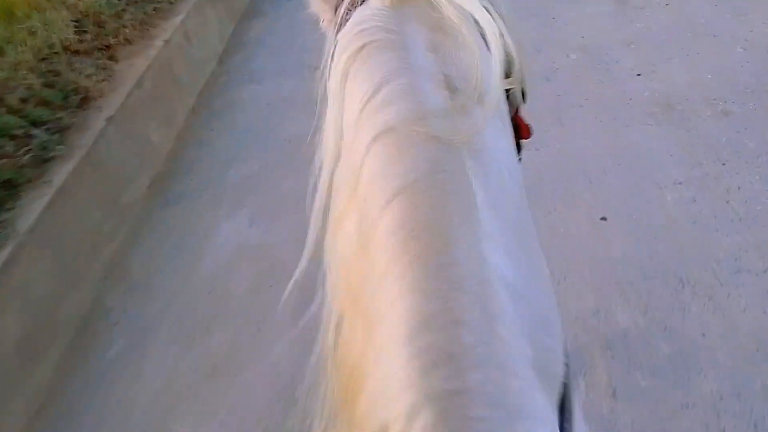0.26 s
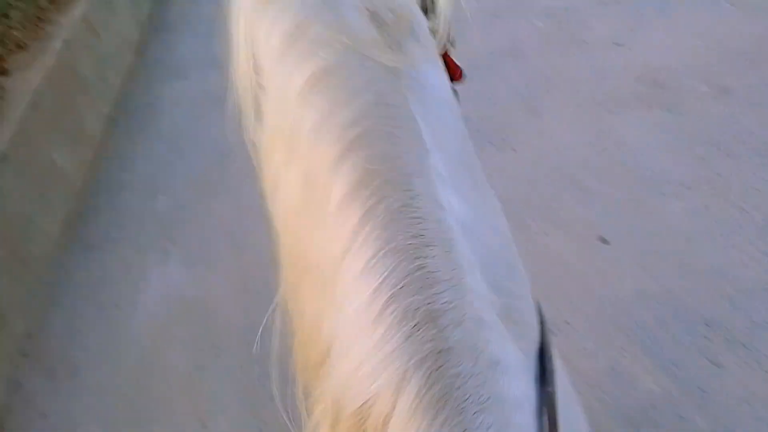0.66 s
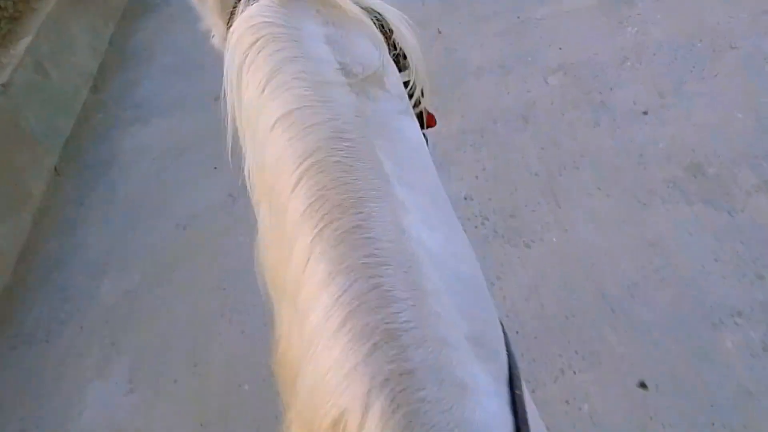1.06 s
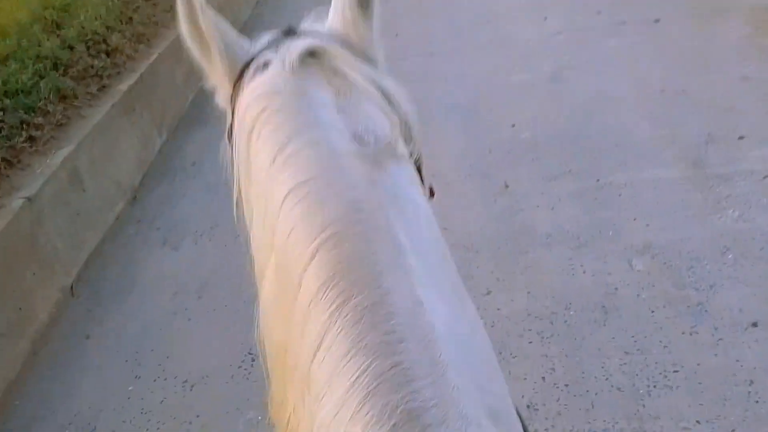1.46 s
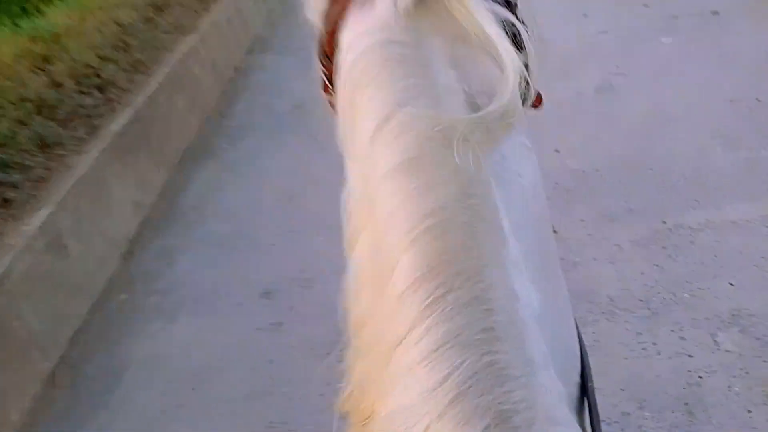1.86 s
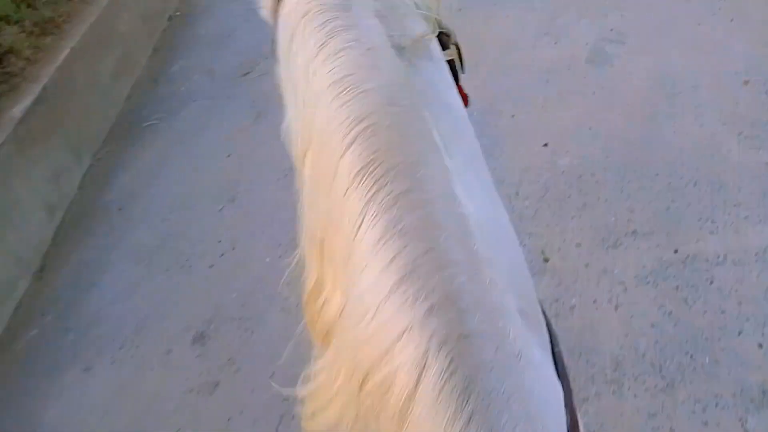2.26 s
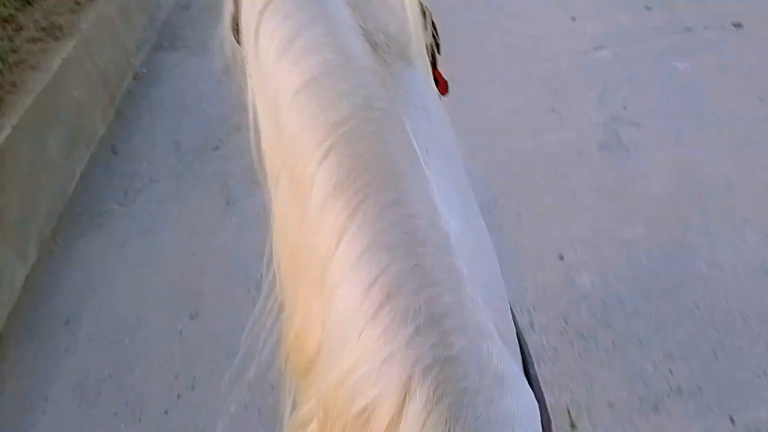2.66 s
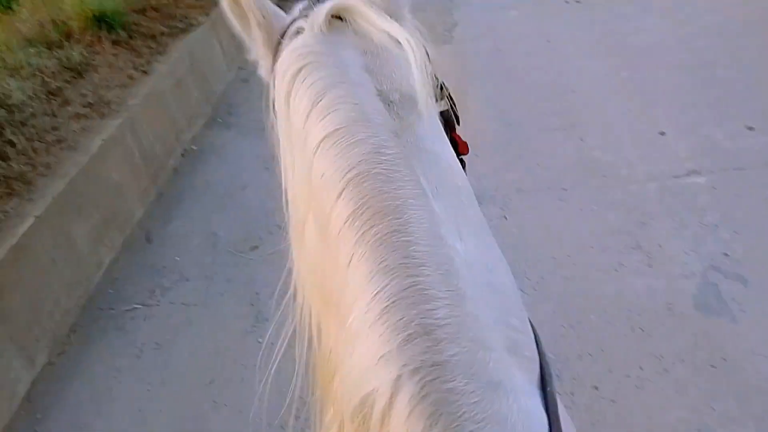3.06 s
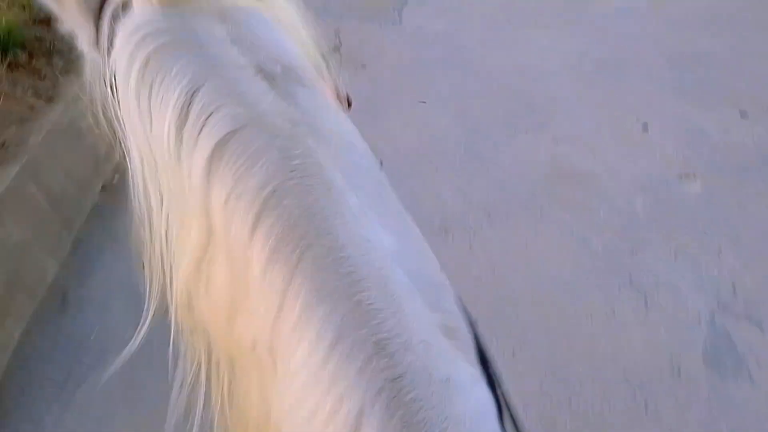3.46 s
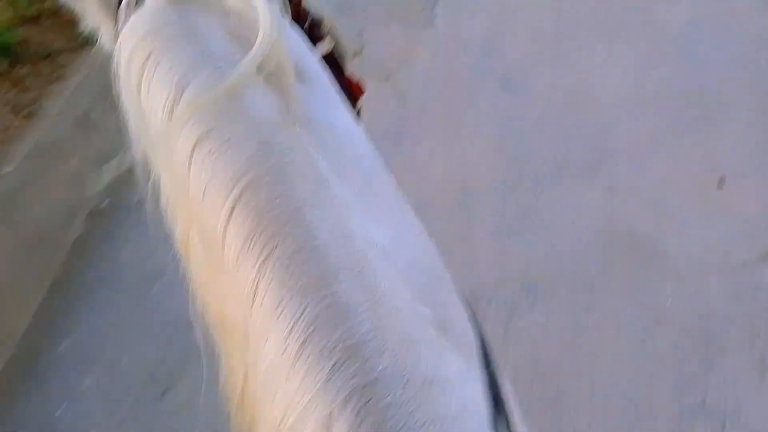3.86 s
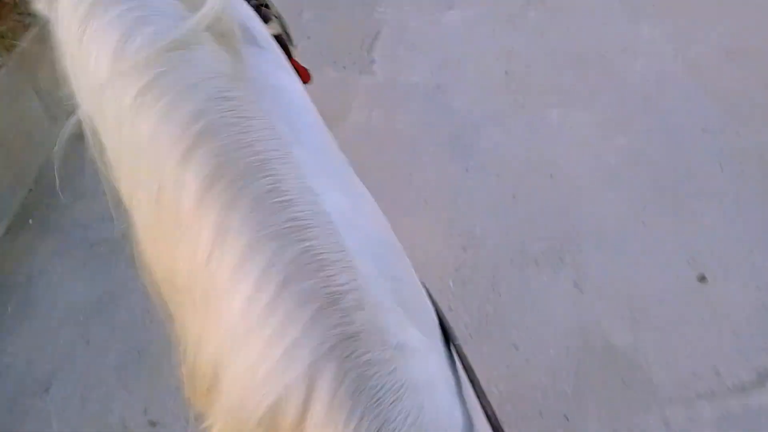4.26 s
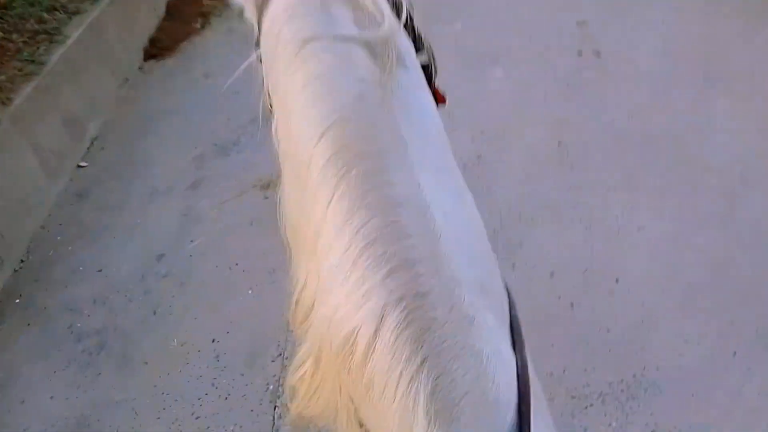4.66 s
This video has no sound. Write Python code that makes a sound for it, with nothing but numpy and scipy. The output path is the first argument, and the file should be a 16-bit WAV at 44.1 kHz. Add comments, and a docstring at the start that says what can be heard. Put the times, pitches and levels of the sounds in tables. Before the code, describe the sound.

Outdoors on a concrete road, heard close from the saddle, shod hooves strike with irregular, short hollow clops, sharp clacks and small gritty scrapes. Low jolts and wind rumble on the microphone. A distant one-cylinder engine putters, slowly sinking in speed, draws nearer after three seconds with a thin whine, then surges loudly just after four seconds. Faint fast cricket chirps fade gradually.

```python
"""Horse and engine on a concrete road

A horse walks, heard from the saddle: struck hooves ring as damped modes, the shoe rim clacks and grit snaps.
The stride thumps the microphone as low damped swings. A one-cylinder engine draws near and opens its throttle:
firing pulses excite pipe and muffler resonances, and shaped noise gives clatter and rasp; a thin tone whines.
Crickets chirp in falling tone pulses on the verge, over filtered noise for far street and wind."""
import sys
import numpy as np
from scipy import signal
from scipy.fft import rfft, irfft, next_fast_len
from scipy.io import wavfile

SR = 44100
rng = np.random.default_rng(int(sys.argv[2]) if len(sys.argv) > 2 else 0)


def generate_wav(sig):
    """Save sig (samples, or channels by samples) to the path in sys.argv[1] as 16-bit PCM at SR."""
    pcm = np.round(np.clip(np.atleast_2d(sig).T, -1, 1) * 32767).astype(np.int16)
    wavfile.write(sys.argv[1], SR, pcm)


N = 212601
TIME = np.arange(N) / SR

# All levels are relative; spectra are levels per hertz before scaling to rms 1.
# hoof contacts: start_s, level_db, ring_hz, hollow_knock_db (re contact), crack_db (re contact)
HOOF_CONTACTS = [(0.012, -14, 1030, -9, -8), (0.189, -14, 910, -4.5, -20), (0.215, -25.5, 785, -10, -2.5),
                 (0.393, -27, 1220, -1.5, 6), (0.399, -16, 974, -9, 0), (0.478, -16.5, 1185, -7, -7.5),
                 (0.529, -22.5, 890, -1.5, 0.5), (0.654, -28, 920, 3.5, -1), (0.668, -24.5, 970, -0.5, -9),
                 (0.684, -24, 966, -3, -5), (0.944, -13.5, 1082, -7, -5.5), (1.118, -22.5, 820, -4, -4),
                 (1.235, -20, 740, -8.5, -25), (1.281, -30, 930, 1, 3.5), (1.397, -23.5, 780, -7, -5),
                 (1.426, -13, 1186, -12, -14), (1.444, -16, 1010, -16, -11), (1.576, -30.5, 950, 6, 0.5),
                 (1.864, -8.5, 1110, -9.5, -7), (2.009, -26.5, 940, -0.5, -23),
                 (2.314, -10.5, 1107, -14, -8), (2.365, -14, 1020, -17.5, -7.5),
                 (2.456, -32.5, 920, 6, -17), (2.657, -29, 770, -9.5, 1), (2.699, -23, 716, -7.5, -2.5),
                 (2.779, -8, 1075, -13.5, -15), (3.035, -30, 800, 0.5, 4), (3.234, -14.5, 1020, -8.5, -19),
                 (3.275, -8.5, 930, -19, -18), (3.688, -8, 1022, -14, -12), (3.813, -23.5, 865, -14, -20),
                 (4.051, -29, 770, -6, 0), (4.108, -31, 1004, -4.5, 0), (4.146, -14.5, 1070, -10, -9.5),
                 (4.191, -9, 904, -19, -20), (4.276, -26.5, 860, 3.5, -6), (4.325, -23, 797, -5.5, -4),
                 (4.609, -16, 910, -12, -11)]
# modes of a hoof whose ring is HOOF_RING_HZ: frequency_hz, level_db, t60_s
HOOF_MODES = [(410, -10, 0.047), (518, -2, 0.024), (685, -8, 0.037), (1088, -1.5, 0.016),
              (1263, -23, 0.042), (1733, -11, 0.013), (1976, 3.5, 0.0071), (2596, -50, 0.03),
              (3200, -24.5, 0.0035), (5100, -55, 0.01)]
HOOF_RING_HZ = 1094
# the heel lands first and the toe follows, softer and lower
TOE_LAG_S, TOE_DB, TOE_PITCH_RATIO = 0.00496, -10.5, 0.9
# noise of the crack on concrete: frequency_hz, level_db
CRACK_SPECTRUM = [(350, -2.5), (700, 11.5), (1200, 8), (1650, -13.5), (2300, 2), (3100, -10.5),
                  (4500, -25.5), (8000, -30.5), (15000, -52)]
# hard strikes on the shoe rim: start_s, level_db, pitch_hz
RIM_CLACKS = [(.478, -31, 2050), (.944, -19.5, 2540), (1.447, -23, 1980), (1.866, -29, 1960),
              (2.3142, -6, 1284), (2.3149, -16, 1890), (2.779, -39, 1280)]
# grit crushed under a sliding hoof: start_s, level_db, length_s
SCUFFS = [(.005, -36.5, 0.031), (0.2, -38.5, 0.017), (.399, -25, 0.019), (0.513, -42, 0.0076),
          (0.664, -36, 0.035), (0.949, -29.5, 0.012), (1.806, -41, 0.029), (1.87, -37, 0.019),
          (2.029, -31, 0.021), (2.331, -33, 0.041), (2.485, -38.5, .04), (2.78, -32.5, 0.016),
          (3.23, -32.5, 0.019), (3.683, -30, 0.013), (4.331, -31, 0.02)]
# noise of crushed grit: frequency_hz, level_db
GRIT_SPECTRUM = [(500, 27), (1200, 9), (2800, 12), (4500, 0.5), (7000, -13.5), (11000, -13.5),
                 (15000, -27.5)]
# single pebbles snapping under the shoe: start_s, level_db
PEBBLE_SNAPS = [(0.3985, -24.5), (.4075, -39), (0.5317, -38.5), (1.817, -40), (2.041, -38), (3.583, -38),
                (3.69, -36), (4.34, -31), (4.354, -32.5)]
# noise of a snapping pebble: frequency_hz, level_db
SNAP_SPECTRUM = [(800, -8.5), (2500, 0.5), (4500, 21.5), (7500, -15), (11500, 14), (15500, -29.5)]
# jolts of the ride: start_s, level_db, pitch_hz
RIDE_THUMPS = [(0.215, -3.5, 104), (0.391, -6, 138), (1.084, -5, 91), (1.282, -3, 56.5), (1.567, -1.5, 73),
               (2.358, -5, 94), (2.502, -1, 59.4), (2.536, -3.5, 53.6), (2.658, -2, 102), (3.034, -2, 103),
               (3.118, -9.5, 73.6), (3.345, -7, 97.5)]

# engine speed, sinking but for one brief rise around the throttle opening: time_s, firings_per_s
FIRING_RATE = [(0, 36.39), (.34, 33.305), (1.06, 32.284), (1.26, 31.376), (2.52, 28.488), (2.98, 26.596),
               (3.98, 25.341), (4.15, 28.436), (4.37, 25.591)]
# weak firings on the overrun: time_s
MISFIRES = [3.385, 3.618, 3.815, 3.932, 4.048]
# lowest exhaust pipe resonance with the throttle shut: time_s, frequency_hz
PIPE_RESONANCE = [(0, 127.7), (.9, 138), (1.5, 131.2), (2.2, 116.2), (2.9, 127), (3.6, 128.7)]
# hotter gas raises the pipe's pitch once the throttle opens
THROTTLE_S, PIPE_RISE_HZ, PIPE_RISE_S = 4.06, 16.4, 0.078
# muffler resonances when the pipe is at MUFFLER_PIPE_HZ: frequency_hz, width_hz, level_db
MUFFLER_MODES = [(233.4, 60, 4.5), (307.3, 44.6, 6.5), (390, 65, -12), (464, 27, -5)]
MUFFLER_PIPE_HZ = 145
# noise of the clattering casing: frequency_hz, level_db
CLATTER_SPECTRUM = [(300, 10.5), (550, 6.5), (760, 11), (950, 10.5), (1250, -1), (1700, -8.5), (2050, 8),
                    (2800, 3.5), (3300, -4), (5000, -17.5), (6500, -19), (9000, -25.5), (11500, -22),
                    (16000, -50)]
# noise of the bright treble hiss: frequency_hz, level_db
RASP_SPECTRUM = [(1500, -24), (3000, -1), (4500, 4), (6500, -8.5), (11000, -14), (16000, -27)]
# the vehicle draws near: time_s, distance_m
VEHICLE_DISTANCE = [(0, 31), (.5, 28.7), (2.8, 28), (3.4, 13.8), (4.05, 13.2), (4.82, 7.4)]
REFERENCE_M = 30
# rows boom, bark, clatter: level_db (at REFERENCE_M), gain_db (per halving of distance),
# gain_db (throttle open), rise_s (time to reach that gain)
ENGINE_LEVELS = [(-22.5, 2.5, 10.5, 0.29), (-30, 7, 4.5, 0.12), (-52, 5.5, 5, .07)]
# whine of the coasting vehicle, sagging as it slows; WHINE_HZ is the starting pitch
WHINE_START_S, WHINE_END_S, WHINE_FADE_S = 3.27, 4.24, 0.08
WHINE_HZ, WHINE_SAG_HZ_PER_S, WHINE_DB, WHINE_WAVER_DB = 928, 22, -46, 1.5

# runs of chirps: first_s, last_s, chirp_count, level_db (re the nearest cricket)
CHIRP_RUNS = [(.008, .445, 8, 0), (.504, 2.298, 31, 0), (2.36, 2.78, 8, -3), (2.88, 4.63, 30, 0),
              (.70, 2.82, 35, -7)]
# the crickets fall behind as the horse walks on; each wing stroke fades as it goes
CRICKET_DB, RECEDE_DB_PER_S, STROKE_FADE_DB = -46, 2.15, -9.5
# far street noise: frequency_hz, level_db
STREET_SPECTRUM = [(100, -21), (180, -2), (300, 4), (450, -9), (700, -19.5), (1000, -18.5), (1600, -30),
                   (2500, -31), (4000, -35.5), (6000, -43.5), (9000, -49), (11300, -44), (15500, -62.5)]
# wind noise on the microphone: frequency_hz, level_db
WIND_SPECTRUM = [(5, 3.5), (18, 8.5), (35, 0), (60, -2.5), (90, -7.5), (130, -10), (200, -21), (400, -41.5),
                 (900, -81)]
# wind strength: time_s, level_db
GUSTS = [(0, -21), (1.1, -19.5), (1.3, -17.5), (1.9, -21), (2.5, -17), (4.06, -16.5), (4.82, -24.5)]
EDGE_HZ = 15800  # upper band limit


def hooves():
    """Modal impact: heel and toe each excite damped hoof modes and a short noise crack on the concrete."""
    ringing, bursts = np.zeros((2, N))
    t = np.arange(4000) / SR
    hz, db, t60 = np.transpose(HOOF_MODES)[:, :, None]
    low, high = hz < 800, hz > 1450  # the hollow knock and the bright crack
    outer = low | high
    # outer modes follow the hoof's ring only by its square root
    pitch_power = np.where(outer, 0.5, 1)
    chance = rng.standard_normal((len(HOOF_CONTACTS), 2, 2, len(hz), 1))
    for (s, contact_db, ring_hz, knock_db, crack_db), pair in zip(HOOF_CONTACTS, chance):
        heel = (s, contact_db, ring_hz)
        toe = (s + TOE_LAG_S, contact_db + TOE_DB, ring_hz * TOE_PITCH_RATIO)
        for (at, hit_db, hit_hz), (detune, uneven) in zip((heel, toe), pair):
            scatter = 1 + 0.04 * detune * outer
            mode_hz = hz * (hit_hz / HOOF_RING_HZ) ** pitch_power * scatter
            mode_db = db + low * (knock_db + 6.5) + high * (crack_db - 3.0) + 1.5 * uneven
            modes = amp(mode_db - 60 * t / t60) * np.sin(2 * np.pi * mode_hz * t)
            add(ringing, at, amp(hit_db + 4.0) * modes.sum(0) * (1 - np.exp(-t / 0.0008)))
            crack = np.exp(-t / 0.0016) * (1 - np.exp(-t / 0.00035))
            add(bursts, at, amp(hit_db + crack_db) * crack)
    return ringing + bursts * noise(CRACK_SPECTRUM)


def clacks():
    """Damped resonance: the rim meets the concrete and rings for a few milliseconds."""
    out, t = np.zeros(N), np.arange(1000) / SR
    envelope = np.exp(-t / 0.0012) * (1 - np.exp(-t / 0.00028))
    for s, db, hz in RIM_CLACKS:
        add(out, s, amp(db) * envelope * np.sin(2 * np.pi * hz * t))
    return out


def grit():
    """Granular fracture: sparse random impulses of uneven size are filtered and swell and die with each scuff."""
    pressure, t = np.zeros(N), np.arange(8000) / SR
    for s, db, length in SCUFFS:
        add(pressure, s, amp(db) * (1 - np.exp(-t / 0.00049)) * np.exp(-(t / length) ** 2))
    size = amp(2.8 * np.minimum(rng.exponential(1, N), 4))
    occurs = rng.random(N) < 4000 / SR  # 4000 grains a second on average
    grains = rng.standard_normal(N) * size * occurs
    return unit(colour(grains, GRIT_SPECTRUM)) * pressure


def snaps():
    """Brittle fracture: a pebble gives way in one short, exponentially decaying noise burst."""
    burst, t = np.zeros(N), np.arange(600) / SR
    for s, db in PEBBLE_SNAPS:
        add(burst, s, amp(db) * np.exp(-t / 0.00035))
    return noise(SNAP_SPECTRUM) * burst


def thumps():
    """Damped oscillation: the stride jolts the microphone into a short, low swing."""
    out, t = np.zeros(N), np.arange(6000) / SR
    u = t / 0.0038
    for s, db, hz in RIDE_THUMPS:
        add(out, s, amp(db) * u * np.exp(1 - u) * np.sin(2 * np.pi * hz * t))
    return out


def engine():
    """Pulse-excited resonance: firings boom in the pipe, bark in the muffler and set the casing clattering."""
    (rate,), (pipe_hz, boom_db, bark_db, clatter_db) = follow(FIRING_RATE), effort()
    cycles = np.cumsum(rate) / SR + 0.1234
    at = np.flatnonzero(np.diff(np.floor(cycles)))
    weak = abs(at[:, None] / SR - np.array(MISFIRES)).min(1) < 0.015
    uneven = rng.standard_normal((len(at), 2))
    soft, sharp = np.zeros((2, N))
    soft[at] = amp(0.5 * uneven[:, 0] - 4.7 * weak)
    sharp[at] = amp(1.1 * uneven[:, 1] - 10 * weak)
    # gas leaves in rounded puffs; the long pipe swells more slowly than the muffler
    push = signal.oaconvolve(soft, np.hanning(round(0.005 * SR)))[:N]
    puffs = signal.oaconvolve(sharp, np.hanning(round(0.0026 * SR)))[:N]
    # each puff comes back once after running the length of the pipe
    puffs = puffs + amp(-5.5) * np.interp(TIME - 1.04 / pipe_hz, TIME, puffs)
    boom = unit(ring(push, pipe_hz, width=12))
    shift = (pipe_hz / MUFFLER_PIPE_HZ) ** 0.8
    bark = unit(sum(amp(db) * ring(puffs, hz * shift, width) for hz, width, db in MUFFLER_MODES))
    # the narrow tailpipe radiates little deep bass
    gas = amp(boom_db + 1.5) * boom + amp(bark_db + 0.9) * bark
    exhaust = signal.lfilter(*signal.butter(1, 60, "high", fs=SR), gas)
    # the casing hisses with the exhaust stroke and again as the valves shut
    phase = cycles % 1
    exhaust_stroke = 0.62 * np.exp(-((phase - 0.06) / 0.045) ** 2)
    valves_shut = 0.73 * np.exp(-((phase - 0.28) / 0.11) ** 2)
    strokes = 0.54 + exhaust_stroke + valves_shut
    clatter = unit(noise(CLATTER_SPECTRUM) * strokes)
    # the bright treble hiss grows twice as many decibels as the clatter
    rasp = amp(2 * clatter_db + 17.5) * unit(noise(RASP_SPECTRUM) * strokes)
    return exhaust + amp(clatter_db) * clatter + rasp


def effort():
    """Distance and load: pipe pitch follows the throttle; boom, bark and clatter levels follow both."""
    def opened(rise_s):
        return np.clip((TIME - THROTTLE_S) / rise_s, 0, 1)

    halvings = np.log2(REFERENCE_M / follow(VEHICLE_DISTANCE)[0])
    levels = [far_db + near_db * halvings + open_db * opened(rise_s)
              for far_db, near_db, open_db, rise_s in ENGINE_LEVELS]
    pipe_hz = follow(PIPE_RESONANCE)[0] + PIPE_RISE_HZ * opened(PIPE_RISE_S)
    return pipe_hz, *levels


def whine():
    """Frequency modulation: a thin sine sags in pitch and wavers at random while the vehicle coasts."""
    hz = WHINE_HZ - WHINE_SAG_HZ_PER_S * (TIME - WHINE_START_S)
    inside_s = np.minimum(TIME - WHINE_START_S, WHINE_END_S - TIME)
    heard = np.clip(inside_s / WHINE_FADE_S, 0, 1)
    angle = 2 * np.pi * np.cumsum(hz * (1 + 0.007 * drift(70))) / SR
    return heard * amp(WHINE_DB + WHINE_WAVER_DB * drift(56)) * np.sin(angle)


def crickets():
    """Stridulation: a chirp is two wing strokes, each a tone that falls and fades as the wing slows."""
    u = np.linspace(0, 1, round(0.012 * SR))  # progress through a stroke
    out = np.zeros(N)
    top_hz, fall_hz = 7980, 1750
    swell = np.sin(np.pi * u).clip(0) ** 0.3
    for first, last, count, db in CHIRP_RUNS:
        chance = rng.standard_normal((count, 2, 5))
        for s, pair in zip(np.linspace(first, last, count), chance):
            receding_db = CRICKET_DB - RECEDE_DB_PER_S * s
            for lag, (late, loud, sharp, fade, start) in zip((0, 0.021), pair):
                hz = (top_hz - fall_hz * u ** 1.2) * (1 + 0.0074 * sharp)
                tone = np.sin(2 * np.pi * (np.cumsum(hz) / SR + start))
                stroke_db = db + receding_db + 1.0 * loud + (STROKE_FADE_DB + 2.4 * fade) * u
                add(out, s + lag + 0.00087 * late, amp(stroke_db) * swell * tone)
    return out


def air():
    """Broadband noise: far street noise drifts in level, and wind on the microphone follows its gusts."""
    street = amp(-35.5 + 1.0 * drift(30)) * noise(STREET_SPECTRUM)
    wind = amp(follow(GUSTS)[0] + 3.5) * noise(WIND_SPECTRUM)
    return street + wind


def roadside(x, t60, wet_db):
    """Diffuse scattering: sparse, decaying random echoes stand for the kerb and verge."""
    t = np.arange(SR // 2) / SR
    occurs = rng.random(len(t)) < 2500 / SR
    taps = rng.standard_normal(len(t)) * occurs * amp(-60 * t / t60) * (t > 0.003)
    taps *= amp(wet_db) / np.linalg.norm(taps)
    return x + signal.fftconvolve(x, taps)[:N]


def ring(x, hz, width):
    """Resonance: a one-pole filter in a turning frame gives a decaying mode whose frequency may move."""
    turn = np.exp(2j * np.pi * np.cumsum(hz * np.ones(N)) / SR)
    decay = np.exp(-np.pi * width / SR)
    return (turn * signal.lfilter([1], [1, -decay], x / turn + 1e-18)).imag


def noise(points):
    """Spectral shaping: white noise filtered to the given spectrum, at rms 1."""
    return unit(colour(rng.standard_normal(next_fast_len(N)), points)[:N])


def colour(x, points):
    """Linear filtering: weights the spectrum by (frequency_hz, level_db) points on a log-frequency axis."""
    hz, db = np.transpose(points)
    f = np.fft.rfftfreq(len(x), 1 / SR)
    gain = amp(np.interp(np.log(f + 1), np.log(hz), db))
    return irfft(rfft(x) * gain, len(x))


def drift(per_s):
    """Random fluctuation: joins per_s chance values a second by straight lines, at rms 1."""
    return unit(np.interp(TIME * per_s, np.arange(4000), rng.standard_normal(4000)))


def follow(rows):
    """Linear interpolation: the columns of a timed curve at every sample."""
    s, *columns = np.transpose(rows)
    return [np.interp(TIME, s, c) for c in columns]


def add(mix, s, sound):
    """Superposition: adds a sound into the mix at time s, in place."""
    part = mix[max(round(s * SR), 0):][:len(sound)]
    part += sound[:len(part)]


def amp(db):
    """Logarithmic level: decibels to amplitude gain."""
    return 10 ** (np.asarray(db) / 20)


def unit(x):
    """Normalisation: scales to rms 1."""
    return x / np.sqrt(np.mean(x ** 2) + 1e-20)


def scene():
    """Superposition of horse, vehicle, insects and air in one channel."""
    horse = roadside(hooves() + clacks() + grit() + snaps(), t60=0.2, wet_db=-13.0)
    verge = roadside(crickets(), t60=0.21, wet_db=-8.5)
    return (horse + thumps() + engine() + whine() + verge + air())[None]


def record(dry):
    """Transduction: loss of the deepest bass, soft overload near full scale, then the band limit."""
    thin = signal.sosfilt(signal.butter(2, 11, "high", fs=SR, output="sos"), dry)
    held = thin / (1 + abs(thin) ** 8) ** (1 / 8)
    low_pass = signal.firwin(511, EDGE_HZ, window=("kaiser", 9), fs=SR)
    return signal.oaconvolve(held, low_pass[None], "same")


dry = scene()
out = record(dry)
generate_wav(out)
```